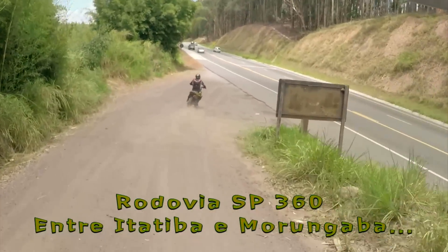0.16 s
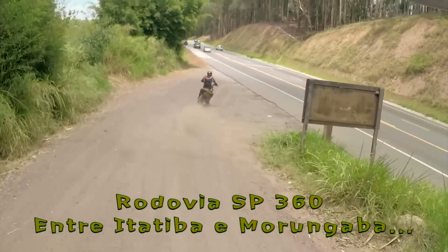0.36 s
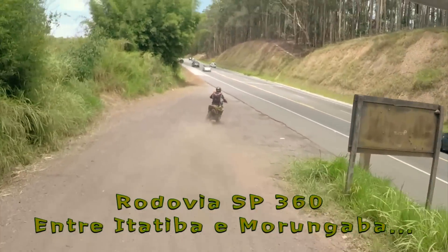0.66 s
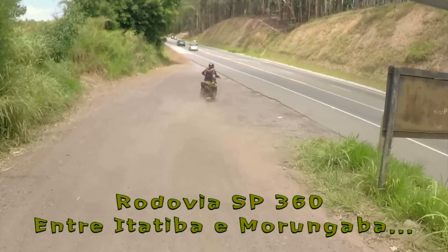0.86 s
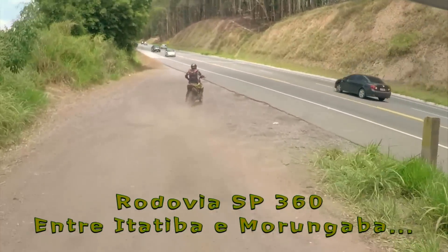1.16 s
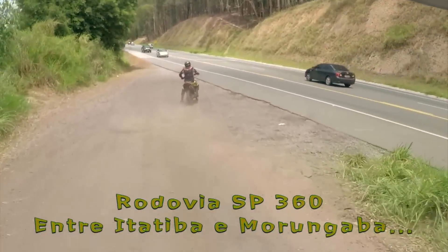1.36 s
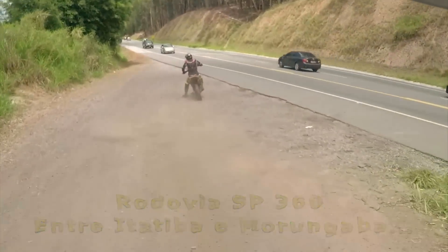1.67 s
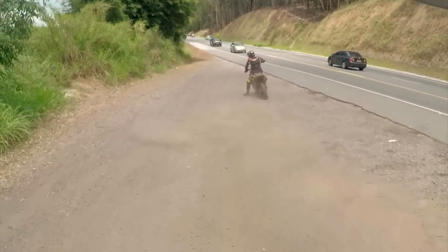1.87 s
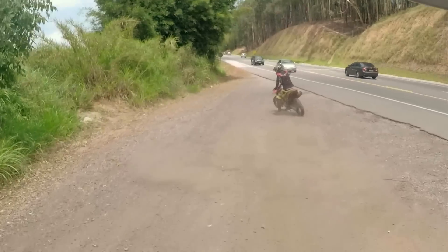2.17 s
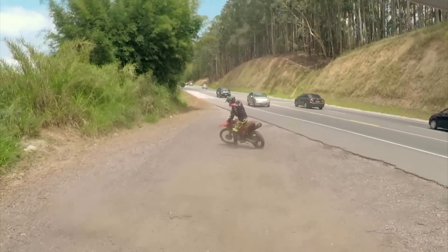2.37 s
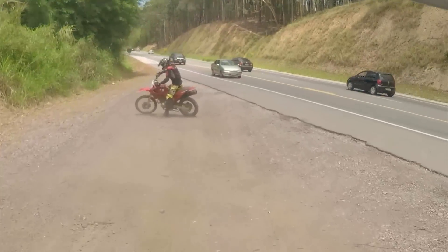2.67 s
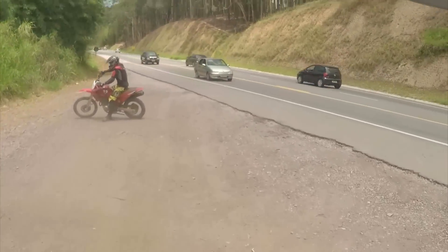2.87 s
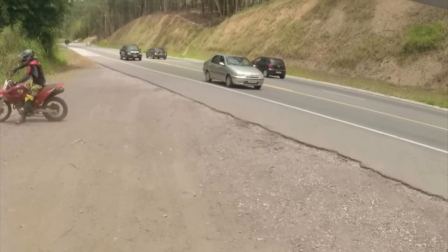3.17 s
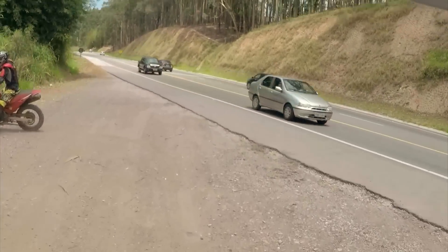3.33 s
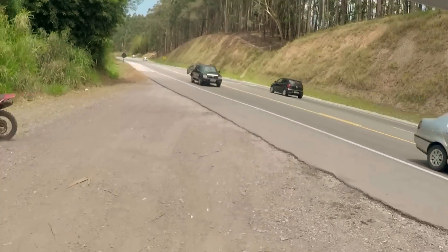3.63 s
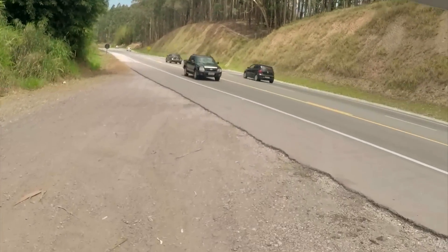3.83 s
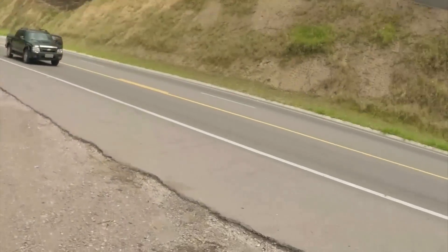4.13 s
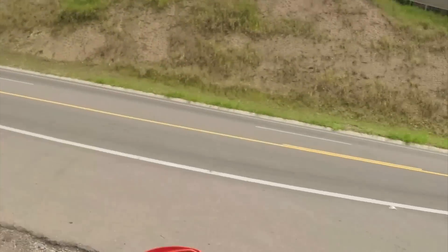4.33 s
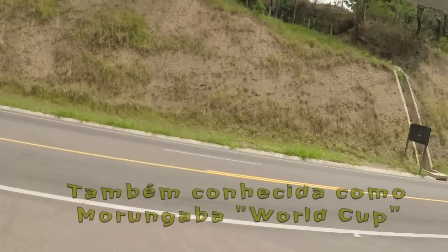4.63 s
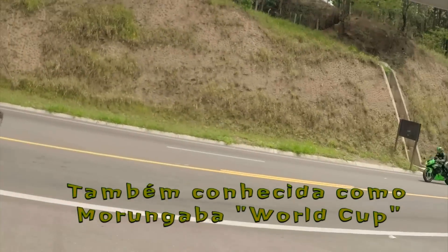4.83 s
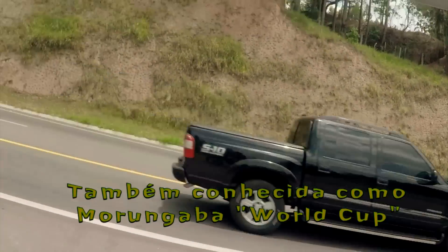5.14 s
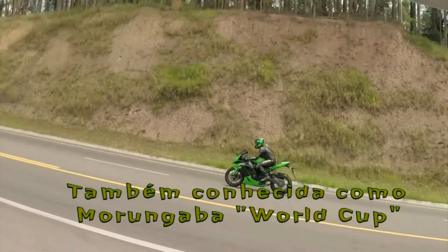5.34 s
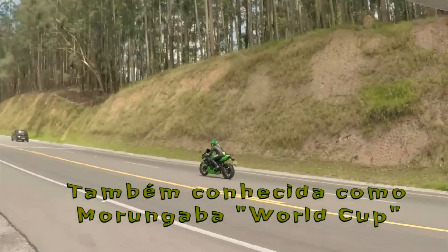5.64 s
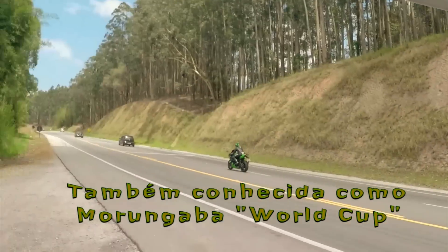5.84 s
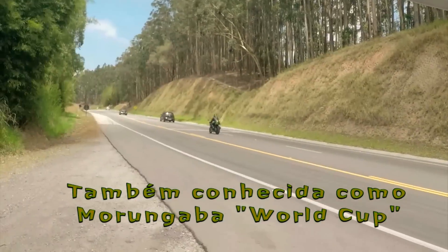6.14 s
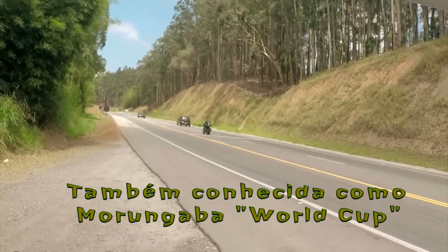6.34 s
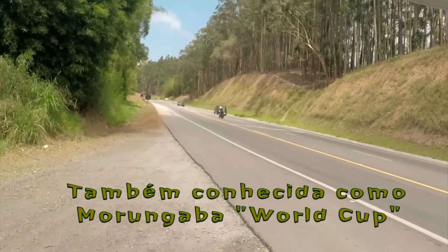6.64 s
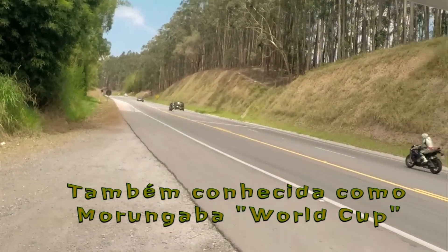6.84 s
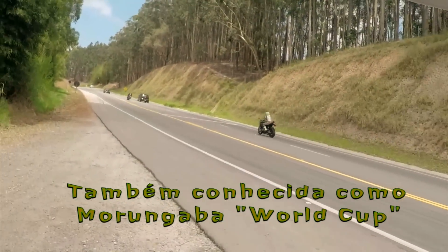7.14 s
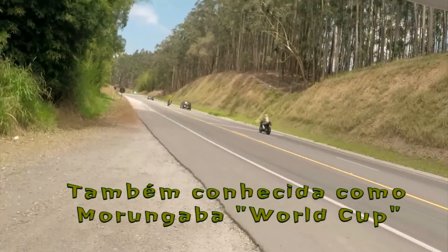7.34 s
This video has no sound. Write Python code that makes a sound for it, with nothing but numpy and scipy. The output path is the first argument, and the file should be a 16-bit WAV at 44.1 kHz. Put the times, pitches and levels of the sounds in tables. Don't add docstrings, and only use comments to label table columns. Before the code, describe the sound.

Handheld outdoor microphone with low wind buffeting. A thumping idle runs throughout, over distant tyre noise and light metallic gravel ticks. Sharp hollow knocks and a buckle rattle hit the case, and the level sinks then creeps back. The idle quickens once at four seconds, a softer knock follows, and a high-revving motorcycle sweeps by amid swelling tyre hiss and recedes, with a duller second engine behind it.

```python
import sys
import numpy as np
from scipy import signal
from scipy.fft import rfft, irfft
from scipy.io import wavfile
from scipy.ndimage import uniform_filter1d

SR = 44100
rng = np.random.default_rng(int(sys.argv[2]) if len(sys.argv) > 2 else 0)


def unload_audio(sound):
    columns = np.transpose(np.atleast_2d(sound))
    steps = np.round(np.clip(columns, -1, 1) * 32767)
    wavfile.write(sys.argv[1], SR, steps.astype(np.int16))


def decibels_to_gain(level_db):
    exponent = np.asarray(level_db, float) / 20
    return 10 ** exponent


N = 330750

# centre in seconds, half length in seconds, wash
# in dB, treble in dB, engine in dB.
FLARES = [(.02, 0.075, -1, 4.5, 0), (.94, 0.033, 1, 2, 0), (2.22, .17, 2, -1.5, 0),
          (2.815, 0.073, 1.5, 1.5, 0), (3.774, 0.088, 0, 2, 14), (5.012, 0.088, 0.5, 2, 2.5),
          (5.112, 0.049, 0.5, 5.5, -2.5), (5.394, 0.12, 2, 6.5, -2), (5.64, 0.16, 0.5, 7.5, -1.5),
          (5.884, 0.036, 2, 3, 1.5), (5.949, 0.028, 1, 7.5, 6.5), (6.202, 0.036, 1.5, -2, 3.5),
          (6.322, 0.05, 0, 6, 8), (6.413, 0.022, 0, 5, 6.5), (6.607, 0.094, 3, -1.5, 1.5)]
SHADOW_S, SHADOW_HALF_S, SHADOW_DB, SHADOW_WASH_DB = 5.235, 0.068, -10, -2.5


def evened(x):
    return x / np.sqrt(np.mean(x ** 2) + 1e-20)


def read(points, hz):
    f, value = np.transpose(points)
    return np.interp(np.log(hz + 1), np.log(f + 1), value)


def columns(rows, t):
    s, *rest = np.transpose(rows)
    return [np.interp(t, s, c) for c in rest]


def bump(t, s, half):
    return np.exp(-((t - s) / half) ** 4)


def flare_db(t, column):
    return sum(row[column] * bump(t, row[0], row[1]) for row in FLARES)


def add(mix, s, sound):
    part = mix[round(s * SR):][:len(sound)]
    part += sound[:len(part)]


def ring(modes, size=20000, rise=0.001):
    t = np.arange(size) / SR
    sines = sum(decibels_to_gain(np.asarray(db - 60 * t / t60)) * np.sin(2 * np.pi * hz * t) for hz, db, t60 in modes)
    return (1 - np.exp(-t / rise)) * sines


def drift(per_s, count=1):
    knots = rng.standard_normal((count, int(N / SR * per_s) + 3))
    return signal.resample(knots, N // 64 + 1, axis=1)


def noise(field_db, size=1024):
    hz = np.fft.rfftfreq(size, 1 / SR)
    t = np.arange(4 * N // size + 4) * size / 4 / SR
    a, b = rng.standard_normal((len(t), len(hz), 2)).T
    spectrum = (a + 1j * b) * decibels_to_gain(field_db(hz[:, None], t))
    return signal.istft(spectrum, nperseg=size, noverlap=3 * size // 4)[1][:N]


def idle():
    # time in seconds, firings so far.
    firings = [(0.0, 0.29), (0.9, 14.5), (1.5, 23.72), (2.1, 33.13), (3.0, 47.65), (3.87, 61.47),
               (3.99, 63.43), (4.11, 65.59), (4.59, 74.95), (4.83, 79.22), (5.07, 83.78), (5.31, 88.15),
               (5.55, 92.33), (5.67, 94.34), (6.5, 107.97), (7.1, 117.63), (7.49, 123.96)]
    # time in seconds, exhaust gain in dB, extra gain of its upper modes in dB.
    throttle = [(0, -0.5, 0), (3.8, 0.5, 0), (4.1, 1.5, 1.5), (4.5, 0, 1), (5.0, 2.5, -3), (5.4, 1.5, 0),
                (5.8, 0, -1), (7.5, 0, -0.5)]
    # frequency in Hz, level in dB, t60 in seconds.
    exhaust = [(68.2, -14.5, 0.13), (128.4, -23, 0.067), (269, -27.5, 0.069), (205.4, -24.5, 0.046),
               (550, -36.5, 0.096), (313, -37.5, 0.047)]
    # delay in ms, sign of first swing, rise in ms.
    exhaust_start = [(12.5, -1, 6), (0, 1, 1.5), (4.7, 1, 2), (0, 1, 1.5), (4.5, 1, 3), (12, 1, 3)]
    s, count = np.transpose(firings)
    whole = np.arange(0, count[-1])
    chance = rng.standard_normal((len(whole), 2))
    at_s = np.interp(whole, count, s, left=0) + 0.00064 * chance[:, 0]
    at = np.clip(at_s * SR, 0, N - 1).astype(int)
    gain_db, upper_db = columns(throttle, at_s)
    puffs, barks, valves = np.zeros((3, N))
    puffs[at] = decibels_to_gain(gain_db + 0.7 * chance[:, 1])
    barks[at] = decibels_to_gain(gain_db + upper_db + 0.8 * chance[::-1, 1])

    boom, pipe = np.zeros((2, 16000))
    for i, (mode, (delay_ms, sign, rise_ms)) in enumerate(zip(exhaust, exhaust_start)):
        add(pipe if i else boom, delay_ms / 1000, sign * ring([mode], rise=rise_ms / 1000))

    turns_s = np.interp(np.arange(0, count[-1], .5) + 0.3, count, s, left=0)
    valves[(turns_s * SR).astype(int)] = decibels_to_gain(4.6 * rng.standard_normal(len(turns_s)))
    tappet = ring([(6500, -51.5, 0.02), (6700, -65.5, 0.011)], size=2000)
    pairs = (puffs, boom), (barks, pipe), (valves, tappet)
    return sum(signal.oaconvolve(hits, response)[:N] for hits, response in pairs)


def knocks():
    # start in seconds, level in dB, main mode in Hz, t60 in seconds, treble in dB,
    # lid ring in dB.
    cracks = [
        (1.9816, 10, 700, 0.014, 1, 1.5),
        (2.4969, 7, 763, 0.021, -3, -4),
        (2.797, 5.5, 780, 0.016, -16, -9.5),
        (4.5221, -4, 880, 0.0095, -19, -9),
    ]
    # start in seconds, level in dB, frequency in Hz, t60 in seconds.
    slaps = [(2.008, -17, 2080, .012), (2.0115, -12, 1350, 0.017), (2.0135, -10, 1100, .015),
             (2.017, -7, 487, .02), (2.021, -6, 1000, .014), (2.0245, -19, 2300, .01),
             (2.027, -9, 940, .014), (2.4992, -6, 1100, .022), (2.4972, -9, 2500, .009),
             (2.7975, -9, 950, .01), (2.8005, -17, 1800, .012), (1.9825, -8, 3600, .006),
             (2.501, -25, 2900, .025), (2.501, -16, 1510, 0.014)]
    # start in seconds, level in dB, frequency in Hz, t60 in seconds.
    thumps = [(1.983, 9, 360, 0.022), (1.986, -6.5, 189, 0.09), (1.991, 4, 78, 0.083),
              (2.5, -13, 370, 0.037), (2.502, -0.5, 136, 0.075), (2.508, -4, 65.9, 0.43),
              (2.799, 1.5, 336, 0.025), (2.799, -10.5, 174, 0.057), (2.808, -11, 73, 0.12),
              (4.524, -1.5, 191.4, 0.065), (4.53, -11, 165, 0.12), (4.531, 0.5, 81.3, 0.24)]
    out = np.zeros(N)
    for s, db, hz, t60, treble_db, lid_db in cracks:
        overtones = [(hz * 1.27 ** k * rng.uniform(0.916, 1.051), treble_db - 3.15 * k, t60 * 0.93 ** k)
                     for k in range(1, 13)]
        shell = ring([(hz, 0, t60), (0.835 * hz, -5, t60)] + overtones, size=4000, rise=0.00076)
        lid = ring([(1700, -2, 0.0091), (2200, 1.5, 0.0073), (2940, -6.0, 0.0067)], size=2000, rise=0.0008)
        treble = ring([(3700, -18, .007), (6480, -26, 0.0091), (8960, -25, .004), (12400, -40, .005)],
                      size=1000, rise=0.00033)
        add(out, s, -decibels_to_gain(db) * shell)
        add(out, s, decibels_to_gain(db + lid_db) * lid)
        add(out, s, decibels_to_gain(db + treble_db) * treble)
    for s, db, hz, t60 in slaps:
        add(out, s, ring([(hz, db, t60)], size=2000, rise=0.00048))
    for s, db, hz, t60 in thumps:
        add(out, s, ring([(hz, db, t60)], rise=0.00093))
    return out


def strap():
    # start in seconds, end in seconds, level in dB, low share 0-1.
    rattles = [
        (1.988, 1.997, -21, 0.33),
        (2.006, 2.017, -28, 0.1),
        (2.01, 2.032, -17, 0.5),
        (2.022, 2.071, -31, 0.11),
        (2.512, 2.565, -32, 0.12),
    ]
    out = np.zeros(N)
    low_body = ring([(390, 6, 0.017), (700, 10.0, 0.0092), (1100, -0.5, 0.016), (1610, -1, 0.0092)], size=900)
    high_body = ring([(1930, -9.0, 0.0052), (2150, -15.0, 0.0092), (3200, -22.5, 0.0016),
                      (5100, -22.0, 0.0055), (6100, -29, 0.0056)], size=900)
    for start, end, db, low in rattles:
        size = int((end - start) * SR)
        grains = rng.standard_normal(size) * decibels_to_gain(2.0 * rng.exponential(1, size))
        grains = grains * signal.windows.tukey(size, .3)
        body = np.clip(low, 0, 1) * low_body + high_body
        add(out, start, decibels_to_gain(db) * evened(signal.oaconvolve(grains, body)))
    return out


def gravel():
    # start in seconds, peak in dB, frequency in Hz, scatter t60 in seconds, broad share 0-1.
    ticks = [(0.0, -31, 2950, 0.015, 0.05), (0.0603, -31, 2950, 0.015, 0.05),
             (0.075, -35.5, 2540, 0.32, 0.4), (0.094, -36, 2150, .02, .05), (0.155, -41, 2600, 0.043, 0.2),
             (0.183, -32, 2630, 0.097, 0.7), (0.211, -34, 2650, 0.05, 0.5), (0.229, -33.5, 2700, 0.05, 0.5),
             (0.284, -36.5, 2650, 0.044, 0.3), (0.3395, -34.5, 2600, 0.041, 0.15),
             (0.407, -38, 2900, .015, .1), (0.412, -31.5, 2500, 0.025, 0.1),
             (0.9338, -33, 2210, 0.18, 0.27), (1.3345, -39, 2800, 0.087, 0.5), (1.349, -36, 2920, .04, .5),
             (1.36, -31.5, 2450, 0.046, 0.5), (1.4066, -37.5, 2570, 0.044, 0.2),
             (1.427, -39, 2150, .03, .05), (1.4655, -39, 2260, 0.077, 0.5), (1.489, -36, 2650, 0.06, 0.3),
             (1.571, -29.5, 2910, 0.02, 0.03), (1.59, -37, 2700, .05, .2), (1.617, -34.5, 2740, 0.033, 0.3),
             (1.6694, -40, 2820, 0.03, 0.7)]
    out = np.zeros(N)
    i = np.arange(4000)
    plate = ring([(2820, 11.5, 0.0038), (3420, 0.5, 0.0041), (5100, 0, 0.0039)], size=1200)
    for s, db, hz, t60, broad in ticks:
        scatter = rng.standard_normal(4000) * np.clip(i / 90, 0, 1) * decibels_to_gain(-60 * i / SR / t60)
        broad = np.clip(broad, 0, 1)
        body = ring([(hz, -9, .013)], size=1200) * (1 - broad) + broad * plate
        tick = signal.oaconvolve(scatter, body)
        add(out, s, decibels_to_gain(db) * tick / abs(tick).max())
    return out


def engine(pitch, rows, top, flutter_db, wobble, upper_db, near):
    pattern_db = (-1.5, -20.5, -2.5, -14.5)
    # frequency in Hz, level in dB.
    silencer = [(150, -43), (400, -26), (550, -14), (1000, -23.5), (1800, -20), (2600, -26), (3500, -30),
                (5000, -37.5), (9000, -53)]
    marked = (5, 6, 7, 10, 14, 16, 18, 20, 21, 22, 24, 28, 30, 34, 35, 40, 42)
    marked_db = (17, 1.5, 9, 1, 0.5, 2.5, 2, 3.5, 10.5, 4.5, 3.5, -14, 6, 5.5, 11, 1.5, 6)
    swell_orders = (21, 21, 16, 12, 50, 33, 50, 10, 30, 7, 14, 12, 12, 10, 10, 14, 14, 16, 16, 16, 20, 20,
                    20, 21, 22, 22, 22, 24, 24, 26, 26, 28, 28, 34, 42, 42, 46, 18, 8, 32, 36, 10, 14, 14,
                    16, 16, 21, 21, 22, 22, 24, 26, 28, 28, 34, 5, 12, 18, 35, 36)
    # centre in seconds, half length in seconds, gain in dB.
    swells = [(5.07, 0.09, 23), (5.63, .07, 7), (4.97, 0.13, 6.5), (7.13, 0.31, 15), (5.42, .12, 9),
              (7.25, .2, 14), (7.15, .2, 16), (5.37, 0.12, 10.5), (5.77, 0.14, -15), (4.25, 0.17, 17),
              (5.6, 0.085, 9.5), (5.35, .17, -8), (6.3, 0.17, -8), (4.9, 0.065, 7.5), (6.85, 0.68, 0),
              (5.4, .07, -6), (6.25, 0.13, 4.5), (6.4, .08, 3.5), (6.35, .22, -7), (7.2, 0.17, 12),
              (4.98, 0.28, 8), (5.7, .1, -12), (6.46, 0.23, 6), (6.6, .3, -7), (5.7, .15, -6),
              (5.55, 0.065, 6.5), (5.85, 0.12, -4), (5.75, .15, 2), (6.3, .1, -3), (5.42, .08, 8.5),
              (6.1, .25, 8), (5.92, .06, 8), (6.9, .06, 12), (5.42, 0.14, -7), (6.3, 0.071, 6),
              (5.94, 0.053, 5), (5.94, 0.041, 6), (5.95, 0.18, 2.5), (4.7, 0.35, 0.5), (5.4, .12, 4),
              (6.04, 0.25, 3), (5.14, .12, 9), (5.08, .2, 6), (6.04, .07, 11), (6.04, .06, -8),
              (4.72, .08, 6), (5.02, .12, 6), (5.92, .06, -8), (5.62, .12, 6), (6.04, .06, 6),
              (5.32, .06, 9), (5.56, .06, -7), (5.08, .08, 8), (6.28, .08, 10), (5.45, .06, 14),
              (5.55, .17, 5), (5.38, .12, -5), (5.5, .12, 4), (5.56, .06, 6), (6.04, .06, 6)]
    # centre in seconds, half length in seconds, frequency in Hz, gain in dB.
    notches = [
        (5.41, 0.093, 1740, -11),
        (6.32, 0.089, 540, -18),
        (4.98, 0.16, 2130, -5),
        (6.3, 0.075, 2600, 6.5),
    ]
    # (dB at no load, dB gained at full load)
    multiples_db = [(-20, 18.5), (-19, 1.5)][:1 + near]
    uneven_idle_db, uneven_load_db = -10, 17
    turn_s, turn_span_s, dull_db_per_octave = 4.99, 0.13, -33
    veil_s, veil_span_s, veil_db = 5.23, .05, -6.5
    beat_per_s, beat_s, beat_db = 3.7, 5.4, 1.5

    start = round(rows[0][0] * SR) // 64
    t = np.arange(start, N // 64 + 1) * 64 / SR
    fine = np.arange(start * 64, N) / SR
    (hz,), (db, load) = columns(pitch, t), columns(rows, t)
    hz = uniform_filter1d(hz, size=70)
    db = db + near * SHADOW_DB * bump(t, SHADOW_S, SHADOW_HALF_S)
    beating_db = near * beat_db * np.cos(2 * np.pi * beat_per_s * (t - beat_s))
    firing_db = [db + beating_db] + [db + idle_db + gain_db * load for idle_db, gain_db in multiples_db]
    veiled_db = near * veil_db / (1 + np.exp((t - veil_s) / veil_span_s))
    base_db = db + upper_db + near * flare_db(t, 4) + veiled_db
    tilt_db = dull_db_per_octave / (1 + np.exp((t - turn_s) / turn_span_s))
    rasp_db = flare_db(t, 3)
    uneven_db = uneven_idle_db + uneven_load_db * load
    shaky_hz = hz * (1 + wobble * drift(40)[0, -len(t):])
    cycle = 2 * np.pi * np.cumsum(np.interp(fine, t, shaky_hz)) / SR / 4
    fades, out = drift(8, count=top), np.zeros(N)
    mark_db = dict(zip(marked, marked_db))
    fade_in = np.clip((t - t[0]) / 0.14, 0, 1)
    for k in range(2, top):
        if k % 2 and k > 52:
            continue
        order_hz, fade_db = k * hz / 4, flutter_db * fades[k, -len(t):]
        if k % 4 == 0 and k // 4 <= len(firing_db):
            level_db = firing_db[k // 4 - 1] + 0.38 * fade_db
        else:
            level_db = base_db + pattern_db[k % 4] + read(silencer, order_hz) + fade_db
            for s, half, f, gain_db in notches:
                octaves = 0.29 * (1 + (f < 1000))
                level_db += near * gain_db * bump(t, s, half) * bump(np.log2(order_hz / f), 0, octaves)
            level_db += mark_db.get(k, 0) + tilt_db * max(np.log2(k * hz.mean() / 4 / 1500), 0)
            level_db += rasp_db * np.clip(k / 28 - 1.5, 0, 1) + uneven_db * (k < 8)
        swell_db = near * sum(gain_db * bump(t, s, half)
                              for order, (s, half, gain_db) in zip(swell_orders, swells) if order == k)
        height = decibels_to_gain(level_db + swell_db) * np.sqrt(2) * fade_in
        out[-len(fine):] += np.interp(fine, t, height) * np.sin(k * cycle + 2 * np.pi * rng.random())
    return out


def passing():
    # time in seconds, firing rate as heard in Hz.
    first_hz = [(3.4, 296), (4.6, 335.3), (4.95, 342.5), (5.2, 341.5), (5.65, 320), (6.05, 319.6),
                (6.25, 323.8), (6.6, 328.3), (7.5, 336)]
    second_hz = [(6.25, 277.6), (6.6, 269), (6.85, 260.1), (7.21, 255.8), (7.5, 254)]
    # time in seconds, level in dB, load 0-1.
    first_level = [(3.4, -47.5, 0.4), (4.2, -36.5, 0.63), (4.7, -33.5, 0.57), (5.1, -25, 0.08),
                   (5.4, -22.5, 0.54), (5.6, -24, 0.78), (5.96, -27.5, 0.66), (6.08, -29.5, 0.46),
                   (7.5, -45, 0.15)]
    second_level = [(6.25, -56, .6), (6.37, -42, 0), (6.62, -35.5, 0.24), (6.73, -34, 0.68),
                    (7.12, -40, 1.04), (7.33, -41.5, 0.6), (7.5, -48, 0.36)]
    first = engine(first_hz, first_level, top=112, flutter_db=3, wobble=.001, upper_db=2.7, near=1)
    second = engine(second_hz, second_level, top=24, flutter_db=4.5, wobble=0.0013, upper_db=0.5, near=0)
    return first + second


def road():
    # time in seconds, level in dB, nearness 0-1.
    traffic = [(0, -38.5, 0.25), (.3, -43, 0.21), (.88, -43, 0.15), (1.64, -41.5, 0.27), (1.9, -43, 0.25),
               (2.15, -49, 0.1), (2.45, -46, .25), (2.7, -40, 0.32), (2.9, -41, 0.35), (3.26, -43, 0.22),
               (3.75, -39.5, 0.19), (4.4, -34, 0.23), (4.9, -33.5, 0.27), (5.35, -31, 0.36),
               (6.2, -31, 0.47), (6.7, -34.5, 0.36), (7.5, -35, 0.49)]
    # frequency in Hz, level in dB.
    far_colour = [(200, 5.5), (350, 1), (450, -11), (800, -5.5), (1400, -12), (2600, -19), (5000, -32.5),
                  (8500, -35), (15250, -41), (15600, -72)]
    near_colour = [(300, -25), (600, -19), (1200, -6), (2500, 5.5), (4000, -5.5), (6000, -4), (9500, -38.5),
                   (15250, -48), (15600, -62)]
    # centre in seconds, half length in seconds, frequency in Hz,
    # gain in dB.
    swishes = [(3.82, .1, 11300, 7), (4.05, .1, 12300, 4), (4.22, .13, 10100, 5), (4.2, .08, 13500, 4),
               (4.35, .06, 14300, 4), (4.0, .07, 8700, 3), (5.6, .35, 14300, 4), (5.6, .4, 13000, -3),
               (5.68, .08, 11200, 3), (5.6, .3, 9500, -2), (2.25, .2, 13500, -9), (2.25, .2, 12000, -6),
               (2.25, .2, 15000, -8), (6.6, .1, 11000, -4), (3.55, .1, 7000, -3)]
    base_treble_db, swish_octaves = -17, .09
    hum_steady = .3
    lull_s, lull_half_s, lull_hz, lull_octaves, lull_db = 5.85, .55, 1800, 1.2, -2.5

    def field_db(hz, t):
        level_db, near = columns(traffic, t)
        level_db = level_db + SHADOW_WASH_DB * bump(t, SHADOW_S, SHADOW_HALF_S) + flare_db(t, 2)
        treble_db = base_treble_db + flare_db(t, 3)
        near = np.clip(near, 0, 1)
        shape = (1 - near) * read(far_colour, hz) + near * read(near_colour, hz)
        band = (hz[:, 0] > 900) & (hz[:, 0] < 4500)
        shape = shape - 10 * np.log10(np.sum(decibels_to_gain(2 * shape[band]), axis=0))

        slope = np.clip(np.log2((hz + 1) / 3500), 0, 1) * np.where(hz > 9000, .75, 1)
        lift = (treble_db + 18.5) * slope
        chance = rng.standard_normal((len(t), len(hz))).T
        patches = evened(uniform_filter1d(uniform_filter1d(chance, 14, 0), 10, 1))
        lift = lift + 0.6 * (hz > 6000) * evened(uniform_filter1d(chance.mean(0), size=4))
        for s, half, f, db in swishes:
            lift = lift + db * bump(t, s, half) * bump(np.log2((hz + 1) / f), 0, swish_octaves)
        lift = lift - hum_steady * np.maximum(level_db + 40, 0) * (hz < 290)
        lull_band = bump(np.log2((hz + 1) / lull_hz), 0, lull_octaves)
        lift = lift + lull_db * bump(t, lull_s, lull_half_s) * lull_band
        return shape + level_db + lift + (1.47 + 0.74 * (hz > 8000)) * patches - 3.5

    return noise(field_db)


def wind():
    # frequency in Hz, density in dB per Hz.
    wind_colour = [(4, -32), (14, 8.5), (27, 12.5), (33, -0.5), (42, -28), (60, -11.5), (150, -30.5),
                   (400, -79)]
    # peak in seconds, level in dB, rise in seconds, fall in seconds.
    gusts = [(.06, -20, 0.049, 0.46), (.81, -24, 0.055, 0.033), (.96, -21.5, 0.021, 0.25),
             (1.31, -18.5, 0.054, 0.037), (1.44, -22.5, 0.045, 0.22), (1.85, -26.5, 0.095, 0.29),
             (2.34, -12, 0.31, 0.041), (2.58, -14, .05, 0.087), (2.92, -12.5, 0.063, 0.033),
             (3.3, -28.5, 0.43, 0.58), (3.86, -22.5, 0.024, .07), (4.18, -20, 0.11, 0.059),
             (4.39, -16.5, 0.062, .025), (4.6, -16, 0.043, 0.022), (5.1, -23.5, 0.54, .15),
             (5.25, -21.5, 0.033, 0.22), (5.8, -26.5, 0.18, 0.071), (6.14, -32, .06, .03),
             (6.41, -26.5, .07, .04), (7.1, -32, 0.44, 0.27), (7.46, -9.5, 0.04, 0.062)]
    breeze_db = -35.5
    rumble = evened(noise(lambda hz, t: read(wind_colour, hz) + 0 * t, size=8192))
    lumps = np.sqrt(uniform_filter1d(rumble ** 2, 5000))
    t = np.arange(0, N + 64, 64) / SR
    power = decibels_to_gain(2 * breeze_db)
    for s, db, rise, fall in gusts:
        power = power + decibels_to_gain(2 * db) * np.exp(-2 * ((t - s) / np.where(t < s, rise, fall)) ** 2)
    return np.sqrt(power).repeat(64)[:N] * evened(rumble / lumps ** 1.15)


def scene():
    camera = knocks() + strap() + gravel()
    return (idle() + camera + passing() + road() + wind())[None]


def roll_off(x):
    return signal.sosfilt(signal.butter(12, 16340, fs=SR, output="sos"), x)


def record(dry):
    # frequency in Hz, width in Hz, gain in dB.
    port = [(1077, 132, 3.5), (1349, 110, 7), (1746, 110, 4), (1970, 1100, -1), (2700, 440, 4.5),
            (3110, 206, -6), (3540, 770, 4.5), (4210, 150, 5.5), (5160, 92, -6), (5940, 1360, -4.5),
            (6810, 520, 4.5), (10600, 930, 4.5)]
    edge_hz, recovery_db_per_s, fall_s = 15330, 18.7, 0.033
    hz = np.fft.rfftfreq(N, 1 / SR)
    port_db = sum(db / (1 + (2 * (hz - f) / width) ** 2) for f, width, db in port)
    log_gain = np.log(decibels_to_gain(np.r_[port_db, port_db[-2:0:-1]]))
    lag = -signal.hilbert(log_gain).imag[:len(hz)]
    passband = (hz > 6) / (1 + (hz / edge_hz) ** 500)
    heard = irfft(rfft(dry) * decibels_to_gain(port_db) * np.exp(1j * lag) * passband, N)

    climb = np.arange(N) * recovery_db_per_s / SR
    peak_db = np.minimum(20 * np.log10(abs(heard[0]) + 1e-9), 9)
    held_db = np.maximum.accumulate(peak_db + climb) - climb
    pole = np.exp(-1 / (fall_s * SR))
    over_db = signal.lfilter([1 - pole], [1, -pole], np.maximum(held_db + 4.5, 0))
    ducked = heard / decibels_to_gain(0.6 * over_db)
    clipped = .99 * ducked / (1 + abs(ducked) ** 6) ** (1 / 6)
    return roll_off(clipped * np.clip(np.arange(N, 0, -1) / 300, 0, 1))


dry = scene()
out = record(dry)
unload_audio(out)
```